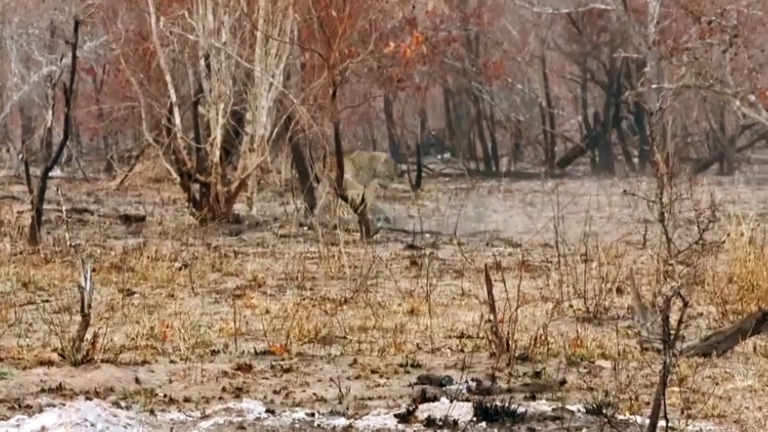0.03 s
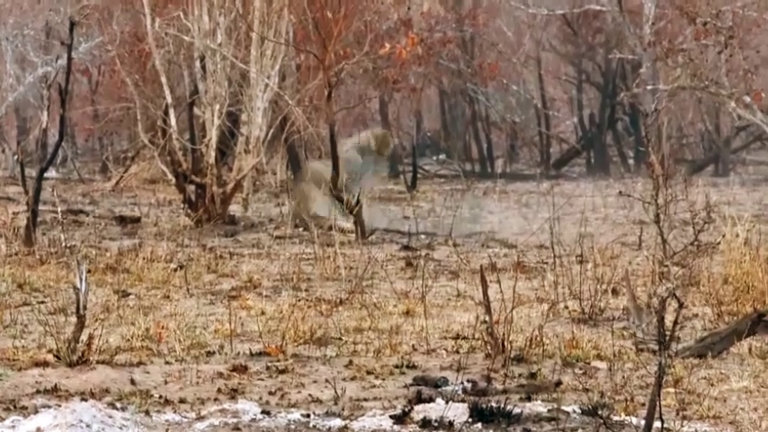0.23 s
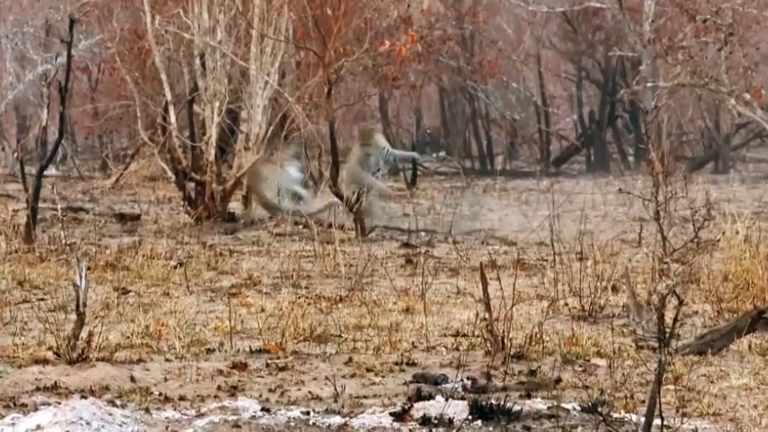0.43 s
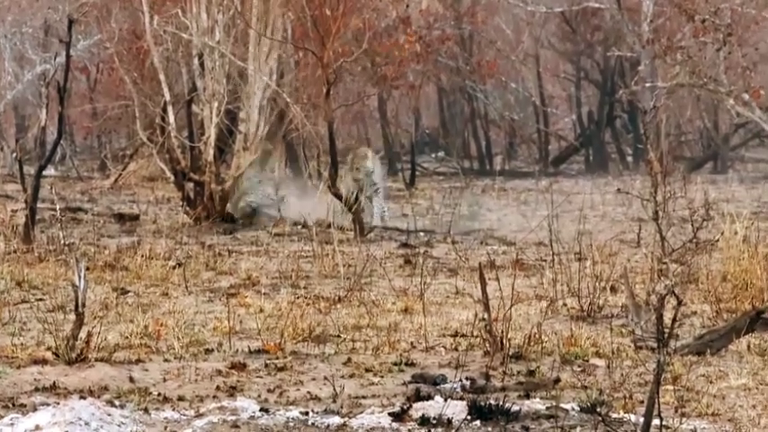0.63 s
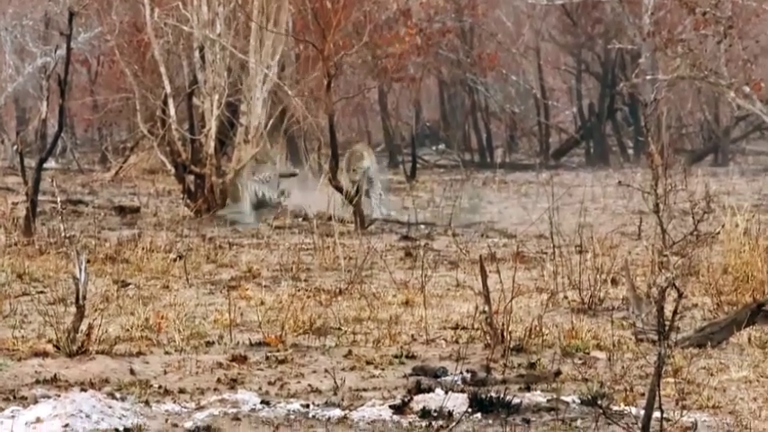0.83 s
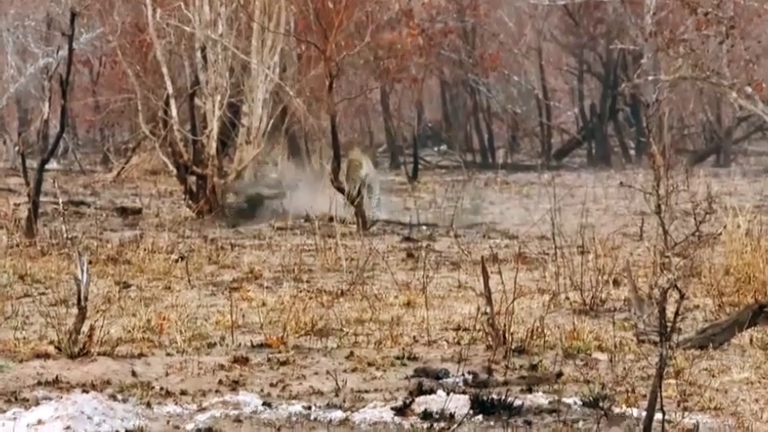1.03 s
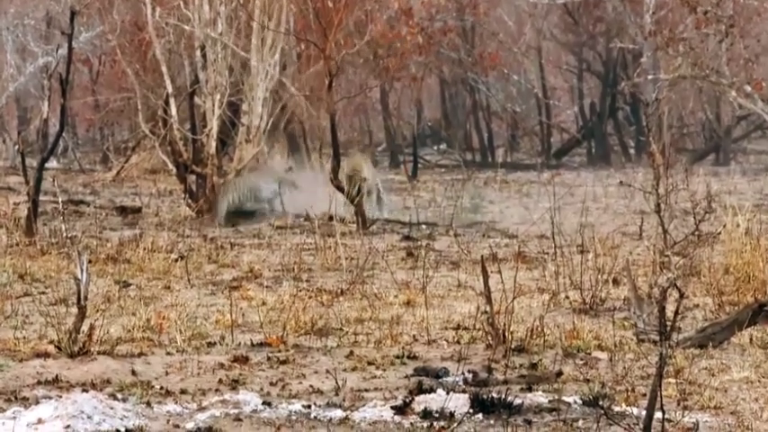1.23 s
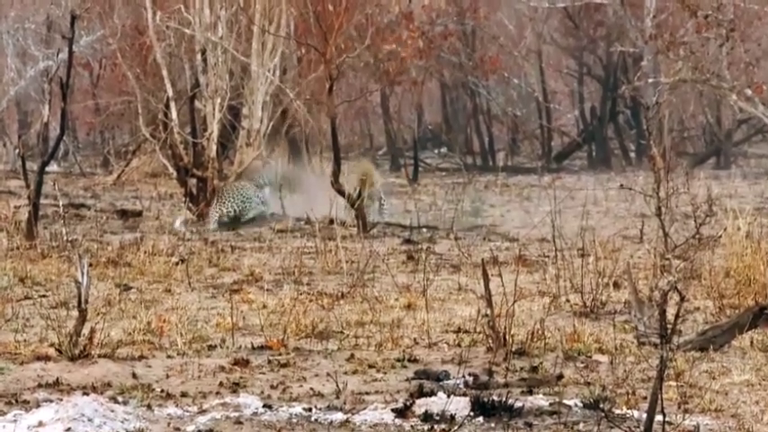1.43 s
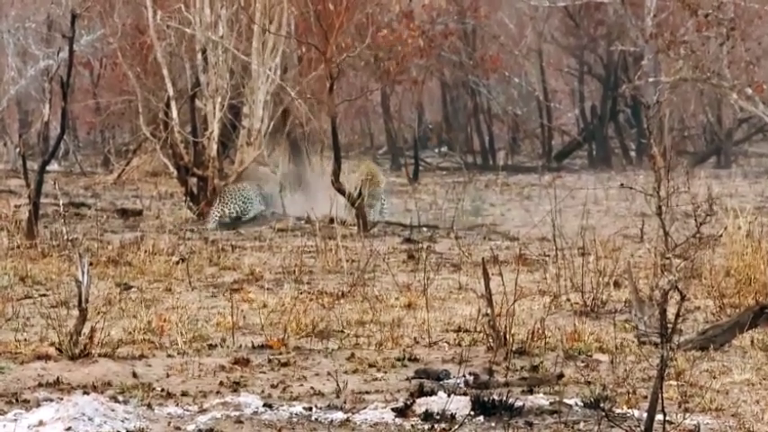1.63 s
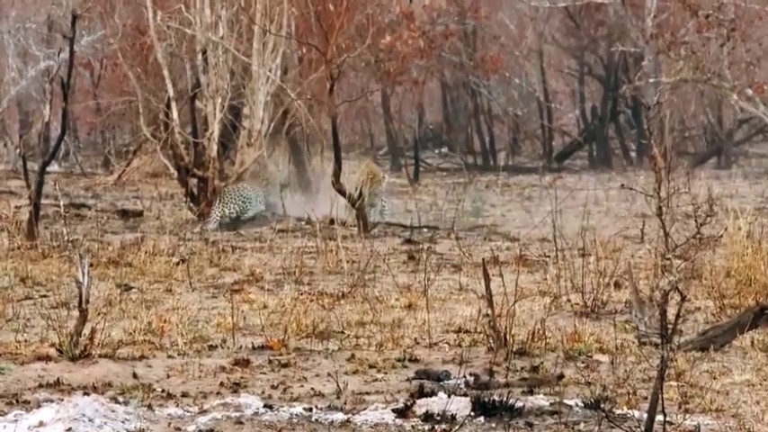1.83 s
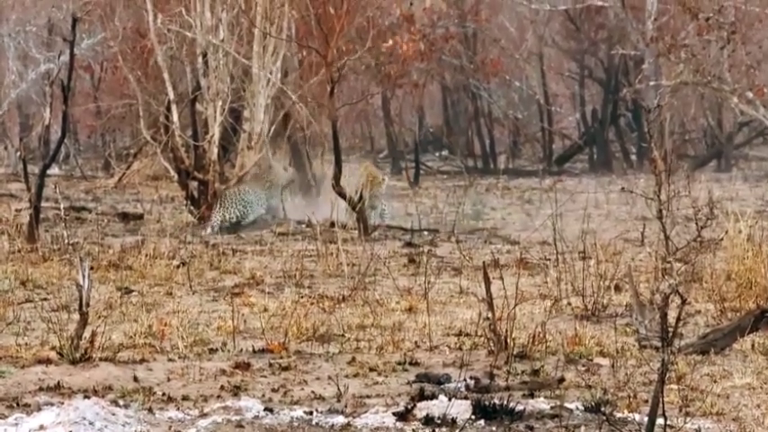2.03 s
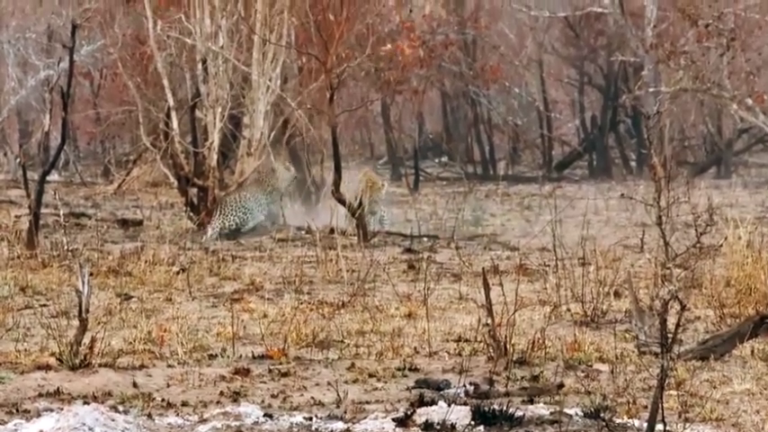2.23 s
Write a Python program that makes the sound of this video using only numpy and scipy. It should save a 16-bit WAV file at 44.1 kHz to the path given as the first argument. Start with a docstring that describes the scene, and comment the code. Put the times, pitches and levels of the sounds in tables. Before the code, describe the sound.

Two leopards fight in dry bush, growling low and snarling in harsh, rasping bursts over steady hiss

```python
"""Two leopards clash in dry bush, some way off, over a steady hiss and a low rumble of filtered noise.
Dry grass scuffs and a low growl of slow, uneven throat pulses come first, then a short grunt and a loud
rasping snarl. A moan of faster pulses leads to a second snarl, and two more growls follow.
Paws strike with short noise bursts, thin gliding tones whistle now and then (probably birds), and
the trees scatter the voices, strikes and whistles as a short tail of fading noise."""
import sys
import numpy as np
from scipy import signal
from scipy.fft import rfft, irfft, next_fast_len
from scipy.io import wavfile
from scipy.ndimage import uniform_filter1d, map_coordinates

SR = 44100
rng = np.random.default_rng(int(sys.argv[2]) if len(sys.argv) > 2 else 0)


def generate_wav(signal):
    """Clip the signal to [-1, 1] and save it as 16-bit WAV at the path in sys.argv[1]."""
    frames = np.transpose(np.atleast_2d(signal))
    scaled = np.clip(frames, -1, 1) * 32767
    pcm = np.round(scaled).astype(np.int16)
    wavfile.write(sys.argv[1], SR, pcm)


N = 101429  # length in samples, 2.3 s


def amp(db):
    """Turn decibels into gain."""
    return 10 ** (np.asarray(db) / 20)


def unit(x):
    """Scale a sound to an average (rms) strength of 1."""
    return x / np.sqrt(np.mean(x ** 2) + 1e-20)


def along(points, hz):
    """Read a curve of (Hz, value) points on a logarithmic frequency axis."""
    f, v = np.transpose(points)
    return np.interp(np.log(hz + 1), np.log(f + 1), v)


def clock():
    """Give the time of every sample in seconds."""
    return np.arange(N) / SR


def curves(rows):
    """Draw one value per sample for each column after the time."""
    s, *cols = np.transpose(rows)
    return [np.interp(clock(), s, c) for c in cols]


def gate(rows, fade_s=0.015):
    """Stay open from a curve's first point to its last, with a short fade outside both ends."""
    since_start = clock() - rows[0][0]
    until_end = rows[-1][0] - clock()
    return np.clip(np.minimum(since_start, until_end) / fade_s + 1, 0, 1)


def wobble(rate):
    """Draw a smooth random curve with this many random points a second."""
    return map_coordinates(rng.standard_normal(4096), [clock() * rate], mode="wrap")


def coloured(x, spectrum):
    """Filter with the given (Hz, dB) shape, so that nothing sounds ahead of its cause."""
    m = 2 * next_fast_len(N // 2 + 8192)
    gain = amp(along(spectrum, np.fft.rfftfreq(m, 1 / SR)))
    # folding the cepstrum forward in time gives a minimum-phase filter
    cep = irfft(np.log(gain + 1e-6))
    cep[1:m // 2] *= 2
    cep[m // 2 + 1:] = 0
    response = np.exp(rfft(cep))
    return irfft(rfft(x, m) * response, m)[..., :N]


def steady(x, size=1500):
    """Even out a source's strength to about 1; size is the averaging window in samples."""
    power = uniform_filter1d(uniform_filter1d(x ** 2, size), size)
    return x / np.sqrt(np.abs(power) + np.mean(x ** 2) / 20)


def patchy(x, depth_db=2):
    """Let the tone colour drift at random from moment to moment."""
    z = signal.stft(x, nperseg=1024)[2]
    field = uniform_filter1d(uniform_filter1d(rng.standard_normal(z.shape[-2:]), 4, 0), 7, 1)
    drifting = z * amp(depth_db * unit(field))
    return unit(signal.istft(drifting, nperseg=1024)[1][..., :N])


def resonate(x, hz, width_hz):
    """Ring one resonance whose centre may move: shift it down to 0 Hz, smooth, shift back."""
    turn = np.exp(2j * np.pi * np.cumsum(hz + np.zeros(N)) / SR)
    smooth = signal.lfilter([1], [1, -np.exp(-np.pi * width_hz / SR)], x / turn)
    return unit((smooth * turn).real)


def pulses(start, rate, rough):
    """Make one click per throat closure from the start on; roughness scatters their times and sizes."""
    jitter, size_db = 0.3, 1  # typical scatter at roughness 1: part of a cycle, dB
    phase = np.cumsum(rate + np.zeros(N)) / SR
    phase -= np.interp(start, clock(), phase)
    cycle = np.arange(int(phase[-1]))
    scatter = (rough + np.zeros(N))[np.searchsorted(phase, cycle)]
    chance = rng.standard_normal((512, 2))[:len(cycle)]
    at = np.searchsorted(phase, cycle + jitter * scatter * chance[:, 0]).clip(0, N - 1)
    return np.bincount(at, amp(size_db * scatter * chance[:, 1]), N)


def puffs(train, leak, decay_s=0.0056):
    """Release a fading puff of air noise at each closure, over a leak of air."""
    opening = unit(signal.lfilter([1], [1, -np.exp(-1 / (decay_s * SR))], train))
    return unit((opening + leak) * rng.standard_normal(N))


def blend(train, noise, share):
    """Mix pulses and noise; share is the noise's part of the power, 0-1."""
    share = np.clip(share, 0, 1)
    return np.sqrt(1 - share) * unit(train) + np.sqrt(share) * noise


def background(spectrum):
    """Make lasting stereo noise that is nearly the same in both ears in the bass."""
    # How alike left and right are. Each row: frequency in Hz, likeness 0-1.
    likeness = [(60, 1), (180, 0.16), (700, 0.035)]
    m = next_fast_len(N)
    turn = np.arccos(np.clip(along(likeness, np.fft.rfftfreq(m, 1 / SR)), -1, 1)) / 2
    noise = rfft(rng.standard_normal((2, m)))
    mid, side = coloured(irfft(noise * [np.cos(turn), np.sin(turn)], m), spectrum)
    return unit(np.array([mid + side, mid - side]))


def open_air(hiss_db=-33.5, rumble_db=-34.5):
    """Lay a steady hiss with a drifting colour over a low rumble, both filtered noise."""
    # Colour of the hiss. Each row: frequency in Hz, level in dB.
    hiss_colour = [(180, -81), (300, -11.5), (401, -3), (800, -3), (3040, -8.5), (12700, -21), (14000, -49)]
    # Colour of the rumble. Each row: frequency in Hz, level in dB.
    rumble_colour = [(22, -31), (50, -20), (110, 1), (190, -4), (280, -11), (400, -22), (700, -42.5)]
    hiss = patchy(background(hiss_colour), depth_db=3.0)
    return amp(hiss_db) * hiss + amp(rumble_db) * background(rumble_colour)


def trees(x):
    """Scatter a sound from trunks and ground: a fading noise tail, different at each ear."""
    # How long the tail lasts. Each row: frequency in Hz, time to fade by 60 dB in seconds.
    fade_times = [(150, 0.19), (700, 0.46), (2000, 0.36), (10000, 0.063)]
    # Colour of the scattered sound. Each row: frequency in Hz, level in dB.
    tail_colour = [(100, -15), (300, -22.5), (700, -6), (1500, -9.5), (3000, 5), (10000, 2)]
    hz, t, z = signal.stft(rng.standard_normal((2, SR // 2)), SR, nperseg=256)
    decay = amp(-60 * t / along(fade_times, hz)[:, None])
    decay_even = decay / np.linalg.norm(decay, axis=1, keepdims=True)
    tail = signal.istft(z * decay_even, SR, nperseg=256)[1]
    scattered = signal.fftconvolve(x[None], tail / np.linalg.norm(tail[0]), axes=1)[:, :N]
    return coloured(scattered, tail_colour)


def whistles(waver=0.0077, flutter_db=5.0):
    """Sing thin gliding tones with weak overtones; they reach the left ear late, so sit to the right."""
    # One list per whistle. Each row: time in seconds, pitch in Hz, level in dB before the partials' own.
    calls = [
        [(1.58, 1770, -48), (1.598, 1860, -36), (1.62, 1980, -31.5), (1.688, 2108, -29), (1.725, 2058, -31.5),
         (1.745, 1850, -45)],
        [(0.29, 2600, -53), (0.333, 3024, -40), (0.37, 2800, -58)],
        [(1.785, 1616, -49.5), (1.85, 1670, -49)],
        [(1.84, 1320, -48), (1.92, 920, -48.5)],
        [(2.16, 4370, -55), (2.25, 3990, -49)],
    ]
    # Level in dB of each of the first three partials, the pitch itself first.
    partials_db = [9, -27, -17]
    left_lag_s, echo_db = 0.000093, -7
    out = np.zeros((2, N))
    for rows in calls:
        hz, db = curves(rows)
        cycles = np.cumsum(hz * (1 + waver * wobble(220))) / SR
        phase = 2 * np.pi * (cycles - hz * np.array([[left_lag_s], [0]]))
        tone = sum(amp(level) * np.sin((k + 1) * phase) for k, level in enumerate(partials_db))
        out += np.sqrt(2) * tone * amp(db + flutter_db * wobble(90)) * gate(rows)
    return out + amp(echo_db) * trees(out[1])


def scuffle(grain_db=3, level_db=-2):
    """Crackle dry stalks under the bodies: grass-coloured noise whose level jitters quickly."""
    # Loudness of the scuffling. Each row: time in seconds, level in dB before level_db is added.
    loudness = [(0.12, -68), (0.215, -27), (0.3, -40), (0.47, -40), (0.53, -31.5), (0.8, -60), (0.98, -28),
                (1.14, -29), (1.24, -40), (1.5, -60), (1.62, -34), (1.83, -32.5), (1.98, -41),
                (2.12, -30.5), (2.2, -44)]
    # Colour of dry grass. Each row: frequency in Hz, level in dB.
    grass = [(250, -65), (500, -9.5), (800, 0.5), (1400, -0.5), (2500, -1), (3200, -9.5), (5500, -9.5),
             (9000, -17), (13000, -45)]
    level = amp(level_db + curves(loudness)[0] + grain_db * wobble(350) + 1.2 * wobble(24.6))
    return level * patchy(coloured(rng.standard_normal((2, N)), grass), depth_db=3)


def swipes(level_db=-2):
    """Strike paws and snap stalks: each is a broad swish and a short ring of dry stalks, dying away."""
    # Each row: start in seconds, level in dB before level_db is added, decay time in seconds,
    # centre of the ring in Hz.
    strikes = [(0.214, -34, 0.017, 1700), (0.493, -26, 0.0089, 2200), (0.789, -20.5, 0.0034, 3950),
               (0.856, -25, 0.004, 3900), (1.304, -21, .012, 5940), (1.38, -18, 0.011, 4120),
               (1.435, -21.5, 0.01, 4540)]
    # Colour of the swish. Each row: frequency in Hz, level in dB.
    swish_colour = [(600, -15), (1500, 9), (3000, -8), (6000, -5), (13000, -14.5)]
    width_hz, ring_db = 880, -5  # ring's width, and its level beside the swish
    out = np.zeros(N)
    for s, db, decay_s, hz in strikes:
        noise = rng.standard_normal(N)
        ring = resonate(resonate(noise, hz, width_hz), hz, 2 * width_hz)
        burst = unit(coloured(noise, swish_colour)) + amp(ring_db) * ring
        fade = (clock() > s) * np.exp(-np.abs(clock() - s) / decay_s)
        out += amp(level_db + db) * unit(burst) * fade
    return out


def growls():
    """Growl with slow, uneven throat pulses that ring the chest behind a closed mouth."""
    # One list per growl. Each row: time in seconds, level in dB.
    calls = [
        [(0.16, -49), (0.186, -16.5), (0.216, -12), (0.366, -21), (0.388, -13.5), (0.424, -27.5), (0.47, -28)],
        [(1.55, -19.5), (1.606, -25.5), (1.638, -19), (1.748, -23.5), (1.766, -20.5), (1.882, -23), (1.95, -39)],
        [(2.0, -47), (2.014, -36), (2.07, -31.5), (2.134, -28.5), (2.216, -59), (2.234, -28), (2.3, -36)],
    ]
    # Colour the chest gives. Each row: frequency in Hz, level in dB.
    chest_colour = [(30, -54), (55, -48), (80, -5), (115, 4.5), (190, 1.5), (250, -15.5), (320, -26.5),
                    (480, -38), (900, -74)]
    rate_hz, rough = 45.43, 0.5  # throat pulses a second, roughness 0-1
    out = np.zeros(N)
    for rows in calls:
        train = pulses(rows[0][0], rate_hz, rough)
        source = blend(train, puffs(train, leak=0.9), share=0.8)
        voice = steady(coloured(source, chest_colour), size=1100)
        out += voice * amp(curves(rows)[0]) * gate(rows)
    return out


def moan():
    """Moan with faster, more even pulses that rise and fall in pitch, air hissing past the teeth."""
    # Loudness of the voice. Each row: time in seconds, level in dB.
    loudness = [(0.94, -30.5), (1.076, -12.5), (1.192, -21.5), (1.254, -41), (1.26, -24)]
    # Pitch of the voice. Each row: time in seconds, pitch in Hz.
    pitch = [(0.95, 88), (1.01, 98.4), (1.05, 100.6), (1.087, 122), (1.125, 112), (1.17, 86.1),
             (1.24, 75.3)]
    # Colour the chest gives. Each row: frequency in Hz, level in dB.
    chest_colour = [(45, -29), (75, -16), (100, 0), (200, -1.5), (260, -5), (340, -24), (450, -38),
                    (800, -56)]
    # Loudness of the hiss. Each row: time in seconds, level in dB.
    hiss_loudness = [(1.0, -51), (1.1, -34.5), (1.16, -36.5), (1.22, -46)]
    # Resonances at the teeth. Each row: centre in Hz, width in Hz, level in dB beside the others.
    teeth = [(1560, 72, 9), (4100, 870, 7), (5410, 100, 3), (7600, 590, -7.5)]
    rough, air_share = 0.3, 0.16  # both 0-1; air noise's part of the voice's power
    train = pulses(loudness[0][0], curves(pitch)[0], rough)
    source = blend(train, puffs(train, leak=1.0), air_share)
    air = puffs(train, leak=2.5)
    hiss = unit(sum(amp(db) * resonate(air, hz, width) for hz, width, db in teeth))
    voice = steady(coloured(source, chest_colour)) * amp(curves(loudness)[0]) * gate(loudness)
    return voice + hiss * amp(curves(hiss_loudness)[0]) * gate(hiss_loudness)


def chest_tones():
    """Sing gliding, nearly pure cycles of the chest, fluttering unevenly with the throat."""
    # One list per glide, the first a short grunt. Each row: time in seconds, pitch in Hz, level in dB.
    glides = [
        [(0.488, 202, -28), (0.498, 189, -16), (0.51, 183, -17), (0.52, 180, -31)],
        [(0.563, 171, -36), (0.579, 188.8, -10), (0.6, 189, -26.5), (0.635, 164, -15), (0.68, 163, -15)],
        [(0.67, 262.4, -37), (0.72, 268.4, -21), (0.8, 267.8, -20.5), (0.84, 248, -21), (0.875, 231, -13.5),
         (0.925, 222, -26)],
        [(0.82, 182, -21), (0.87, 169, -18.5), (0.905, 155, -15.5), (0.925, 149, -32.5)],
        [(1.278, 124, -29), (1.3, 138.4, -13), (1.321, 185.3, -7), (1.34, 196.2, -13), (1.36, 181.4, -15.5),
         (1.385, 139, -17.5), (1.425, 130, -13), (1.445, 123, -29)],
        [(1.405, 218.5, -33), (1.425, 218, -9), (1.455, 205.8, -17), (1.495, 180.7, -10.5),
         (1.525, 157.7, -18.5), (1.55, 160, -18.5)],
    ]
    flutter_hz, flutter_depth = 57.26, 0.33  # beat of the throat, its depth 0-1
    waver = 0.025  # pitch unsteadiness, as a part of the pitch
    below_db, above_db = -27, -22  # an octave below and above
    out = np.zeros(N)
    for rows in glides:
        hz, db = curves(rows)
        started = clock() > rows[0][0]
        phase = 2 * np.pi * np.cumsum(hz * (1 + waver * wobble(70)) * started) / SR
        beat = 2 * np.pi * flutter_hz * clock() + 1.37 * wobble(25.11)
        flutter = 1 + flutter_depth * np.sin(beat)
        tone = np.sin(phase) + amp(above_db) * np.sin(2 * phase) + amp(below_db) * np.sin(phase / 2)
        out += unit(flutter * tone) * amp(db) * gate(rows)
    return out


def snarls(chest_db=-0.5, rasp_db=0.0, hiss_db=1.0):
    """Drive chest, open mouth and hiss at the teeth with one pulse train; cracks merge into a rasp."""
    # One list per snarl. Each row: time in seconds, then chest, mouth rasp and hiss levels in dB,
    # before chest_db, rasp_db and hiss_db are added.
    calls = [
        [(0.55, -18, -57, -43), (0.564, -19, -17.5, -34), (0.578, -12.5, -18, -43.5), (0.61, -23, -16.5, -62),
         (0.629, -11, -16, -42), (0.64, -22, -30, -45), (0.662, -18, -17.5, -61), (0.705, -15.5, -19, -32),
         (0.782, -16, -15.5, -31), (0.88, -17.5, -17.5, -29.5), (0.95, -30, -35, -45)],
        [(1.26, -32, -47, -50), (1.276, -20, -44, -45), (1.288, -19, -34, -36), (1.31, -14.5, -20, -30.5),
         (1.37, -17, -33.5, -38.5), (1.39, -14, -22, -31.5), (1.48, -17.5, -20, -34), (1.502, -11, -19.5, -33),
         (1.56, -31, -34.5, -47), (1.58, -15.5, -44, -50)],
    ]
    # The throat, one list per snarl. Each row: time in seconds, pulse rate in Hz, roughness 0-1.
    throats = [
        [(0.558, 59.53, 0.21), (0.61, 57.96, 0), (0.635, 54.92, 0.05), (0.69, 53.87, 0.44), (0.74, 72.3, 0.58),
         (0.81, 67.8, 0.46), (0.92, 53.1, 0.3)],
        [(1.275, 62.47, .35), (1.33, 59.53, 0.44), (1.43, 67.73, 0.87), (1.57, 48.42, 0.64)],
    ]
    # Colour the chest gives, one list per snarl. Each row: frequency in Hz, level in dB.
    chest_colours = [
        [(40, -51), (123, -5.5), (172, 4), (290, -14), (350, -8.5), (800, -62)],
        [(40, -44), (91, -13.5), (188, 4), (370, -12.5), (430, -29), (800, -75)],
    ]
    # Colour the open mouth gives, one list per snarl. Each row: frequency in Hz, level in dB.
    mouth_colours = [
        [(250, -32), (450, -17), (720, -7.5), (1020, -9), (1250, 8), (1800, -8), (2200, -1.5), (3100, -29.5),
         (7000, -100)],
        [(400, -36), (640, -22), (1250, 0.5), (1800, -6.5), (2500, -9), (3300, -29), (7000, -100)],
    ]
    # Colour of the hiss. Each row: frequency in Hz, level in dB.
    hiss_colour = [(1710, -14), (2850, 1), (3240, 0), (3820, 2.5), (4400, 1), (5400, -3), (7200, -9.5),
                   (9400, -10.5), (12000, -21), (13400, -25)]
    # Throat and mouth resonances that move with the jaw, one list per snarl. Each resonance: width in Hz,
    # then its path. Each row of a path: time in seconds, centre in Hz, level in dB.
    jaw_resonances = [
        [(134, [(0.572, 920, -31), (0.592, 786, -15), (0.63, 796, -40), (0.79, 736, -29), (0.9, 590, -31.5)]),
         (35, [(0.57, 1286, -44), (0.607, 1314, -20), (0.66, 1527, -17.5), (0.8, 1564, -19.5),
         (0.91, 1510, -22)]), (170, [(0.7, 3800, -48), (0.79, 4000, -30.5), (0.92, 3660, -51)]),
         (400, [(0.74, 5570, -53), (0.85, 5280, -34), (0.92, 5540, -52)])],
        [(45, [(1.38, 1663, -26), (1.43, 1644, -19), (1.485, 1445, -18), (1.53, 1270, -34)]),
         (110, [(1.39, 2080, -23.5), (1.47, 2020, -34), (1.555, 2660, -35)])],
    ]
    out = np.zeros(N)
    for rows, throat, chest_colour, mouth_colour, resonances in zip(
            calls, throats, chest_colours, mouth_colours, jaw_resonances):
        low, mid, high = curves(rows)
        rate, rough = curves(throat)
        train = pulses(throat[0][0], rate, rough)
        chest_source = blend(train, puffs(train, leak=0.14), share=0.27)
        chest = steady(coloured(chest_source, chest_colour), size=800)
        # a rougher throat leaks more air and sounds noisier
        cracks = puffs(train, leak=0.4 + 5.2 * rough, decay_s=0.0028)
        source = blend(train, cracks, share=0.81 + 0.41 * rough)
        rasp = steady(patchy(coloured(source, mouth_colour), depth_db=1.5))
        hiss = steady(patchy(coloured(puffs(train, leak=1.9), hiss_colour), depth_db=3.0))
        voice = amp(low + chest_db) * chest + amp(mid + rasp_db) * rasp + amp(high + hiss_db) * hiss
        out += gate(rows) * voice
        for width_hz, path in resonances:
            hz, db = curves(path)
            ring = resonate(resonate(source, hz, 4 * width_hz), hz, width_hz)
            out += steady(ring) * amp(db) * gate(path)
    return out


def scene():
    """Put the fight straight ahead, with its echo, the grass, the whistles and the open air."""
    voices = growls() + chest_tones() + moan() + snarls()
    strikes = swipes()
    air = open_air()
    echo = trees(voices + amp(-5.5) * strikes)
    return voices + strikes + echo + scuffle() + whistles() + air


def record(dry):
    """Round off peaks near full scale, then remove everything from the top frequency up."""
    top_hz = 13400
    rounded = dry / (1 + np.abs(dry) ** 8) ** (1 / 8)
    m = next_fast_len(N + 4096)
    keep = np.fft.rfftfreq(m, 1 / SR) < top_hz
    return irfft(rfft(rounded, m) * keep, m)[:, :N]


dry = scene()
out = record(dry)
generate_wav(out)
```